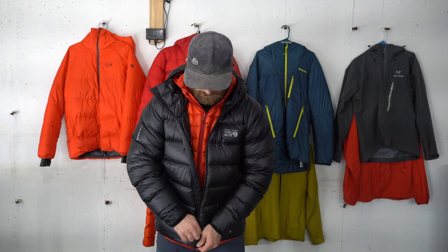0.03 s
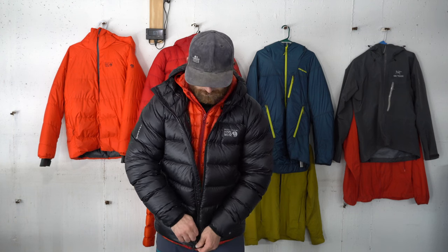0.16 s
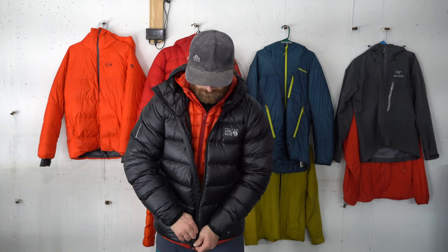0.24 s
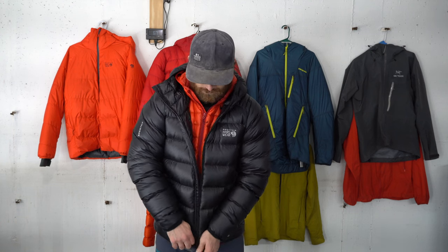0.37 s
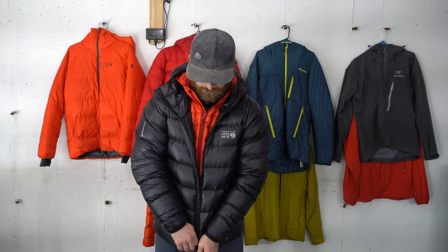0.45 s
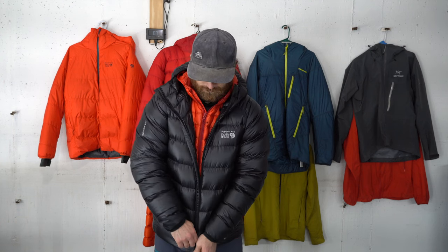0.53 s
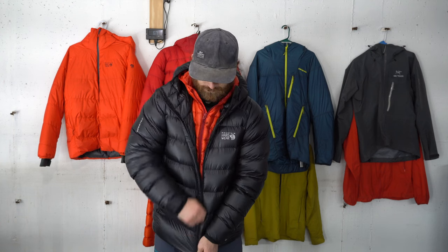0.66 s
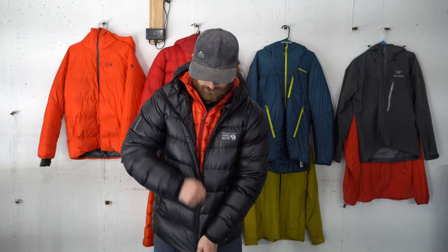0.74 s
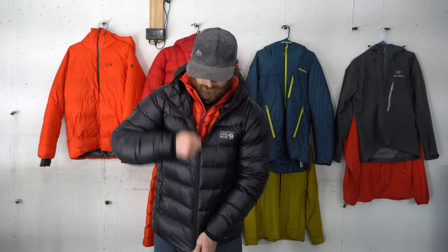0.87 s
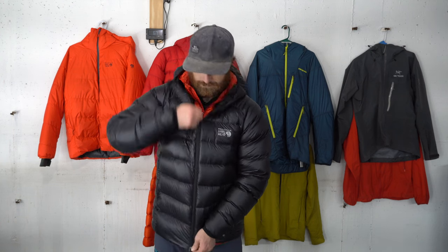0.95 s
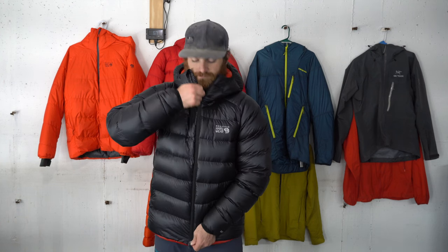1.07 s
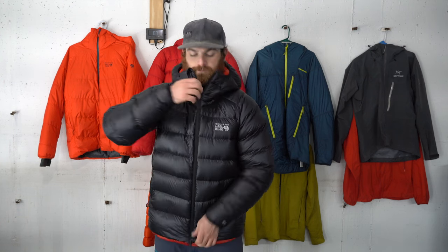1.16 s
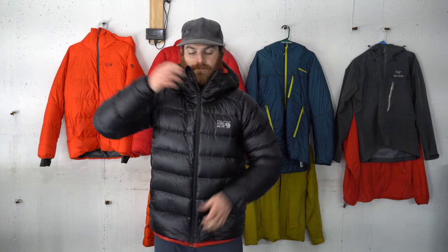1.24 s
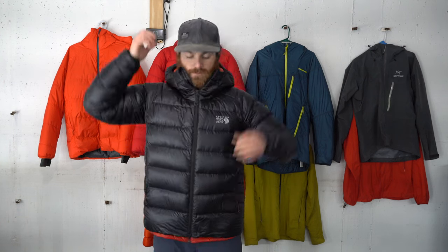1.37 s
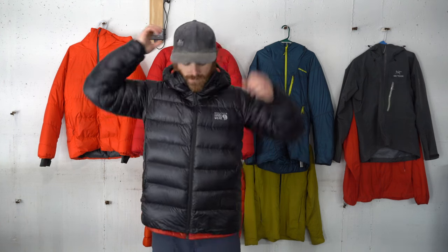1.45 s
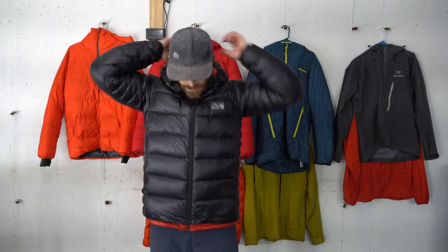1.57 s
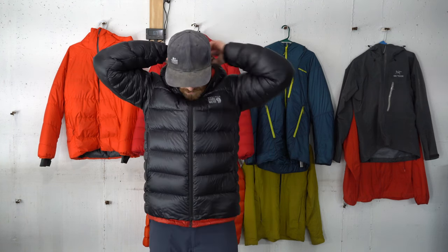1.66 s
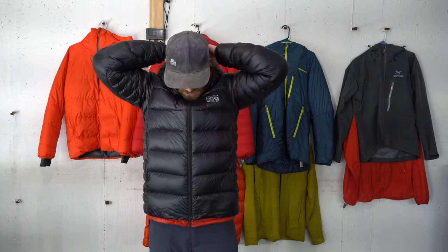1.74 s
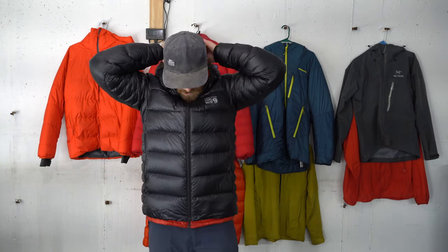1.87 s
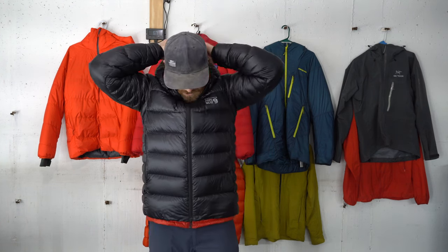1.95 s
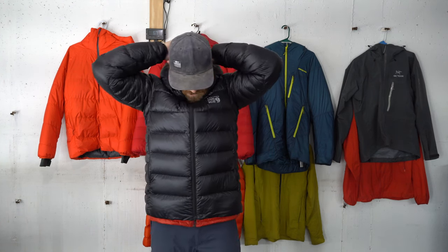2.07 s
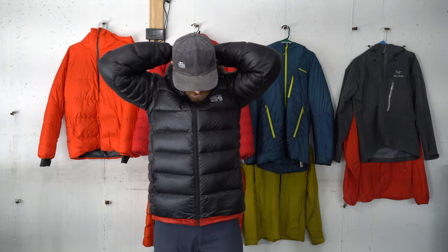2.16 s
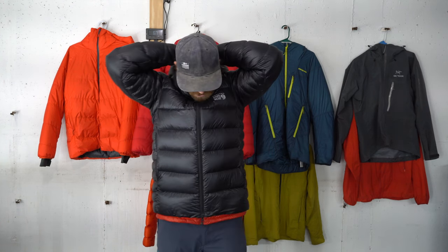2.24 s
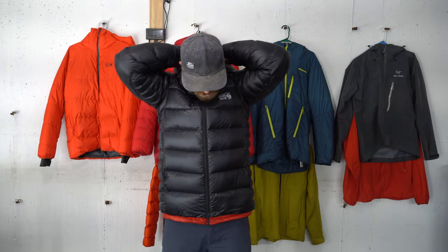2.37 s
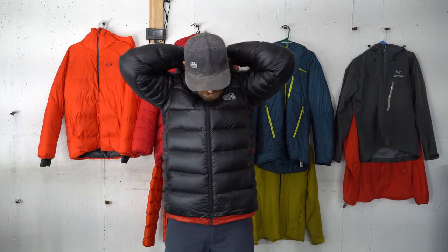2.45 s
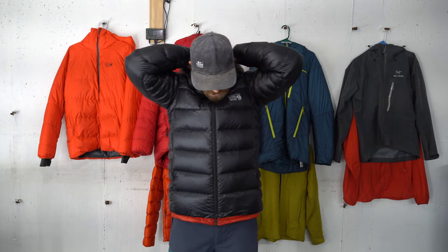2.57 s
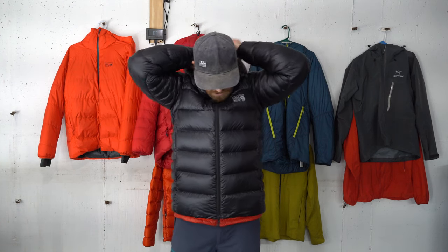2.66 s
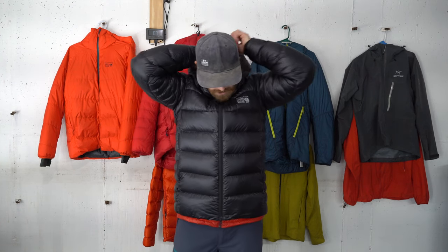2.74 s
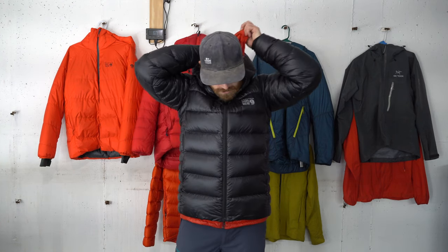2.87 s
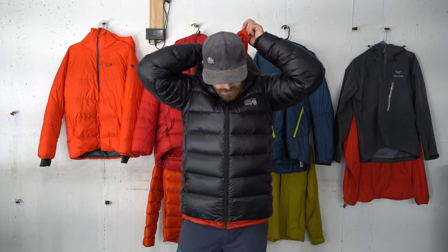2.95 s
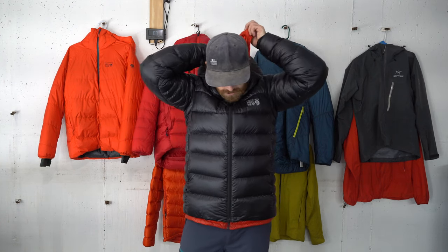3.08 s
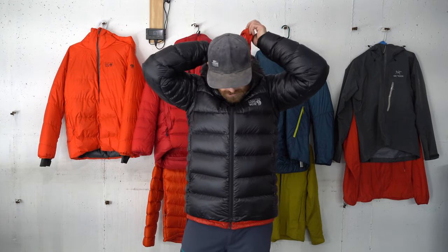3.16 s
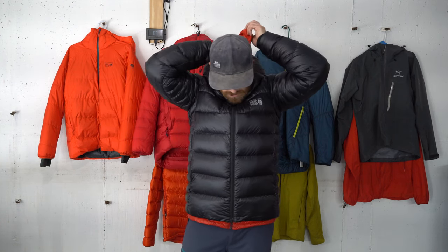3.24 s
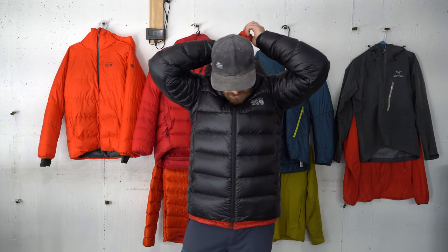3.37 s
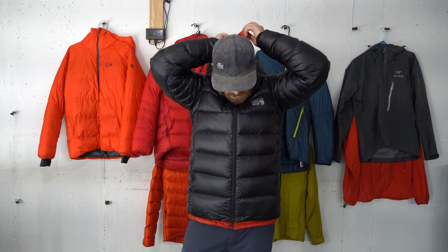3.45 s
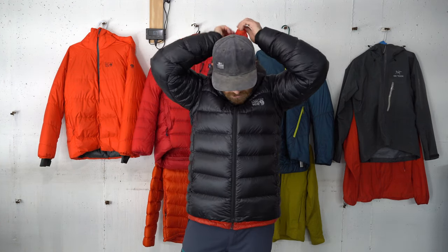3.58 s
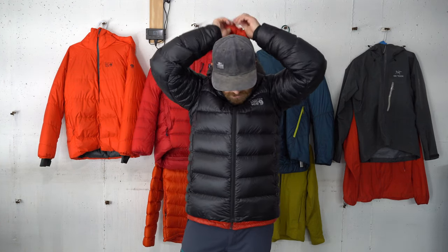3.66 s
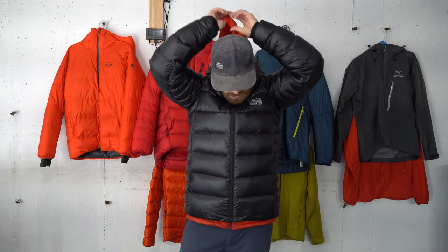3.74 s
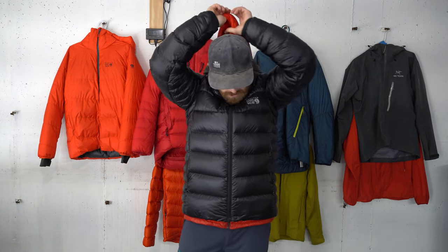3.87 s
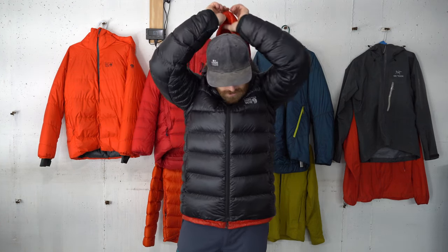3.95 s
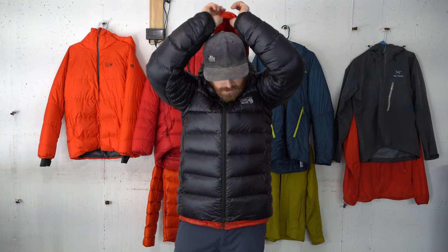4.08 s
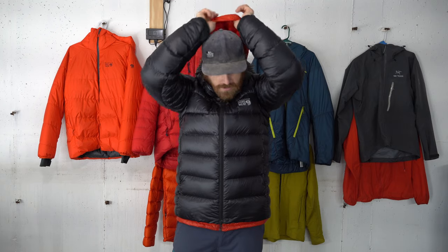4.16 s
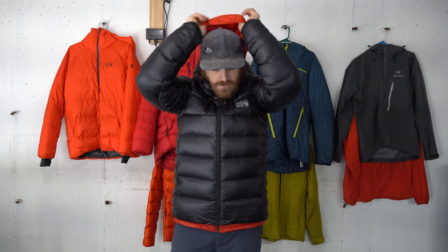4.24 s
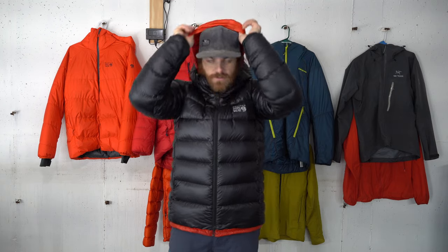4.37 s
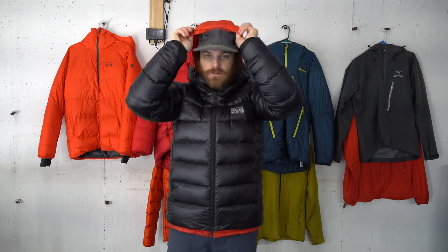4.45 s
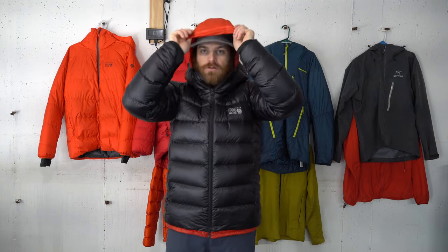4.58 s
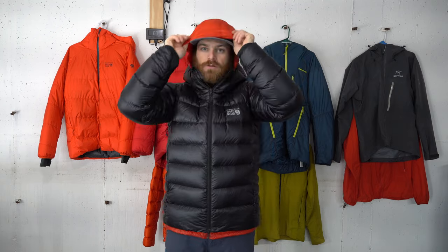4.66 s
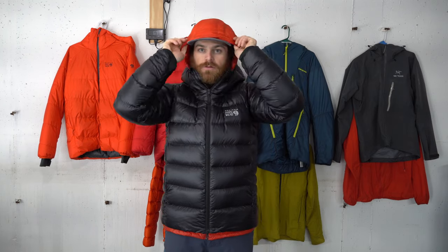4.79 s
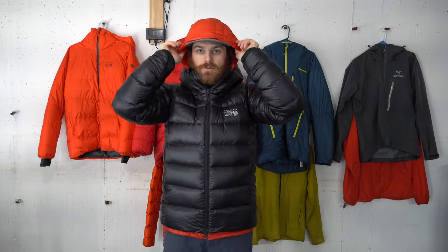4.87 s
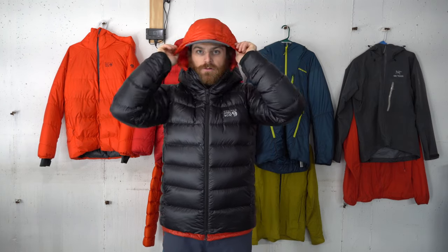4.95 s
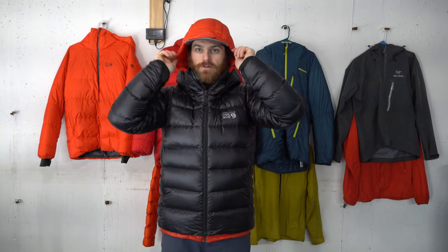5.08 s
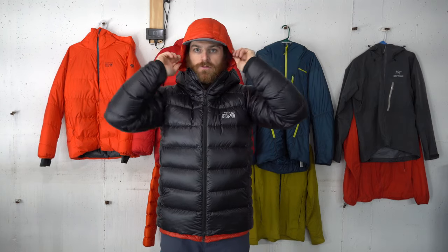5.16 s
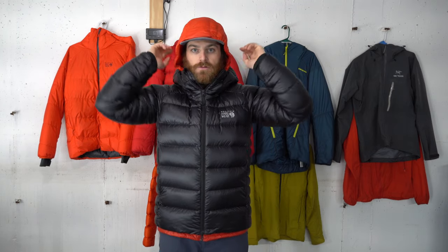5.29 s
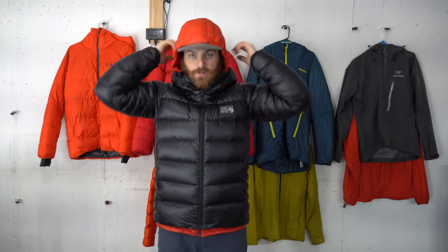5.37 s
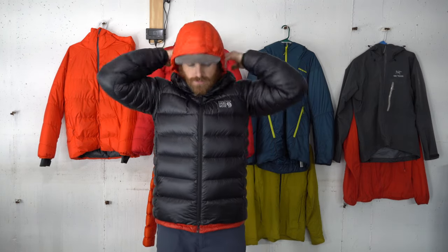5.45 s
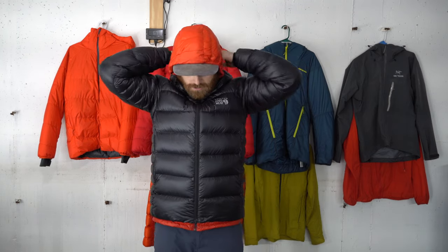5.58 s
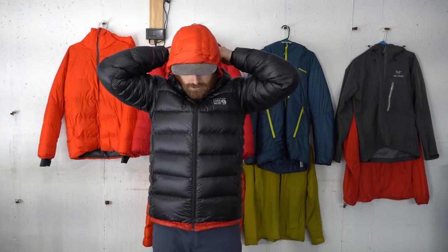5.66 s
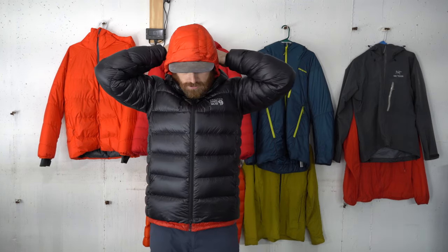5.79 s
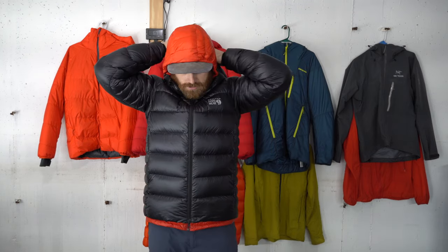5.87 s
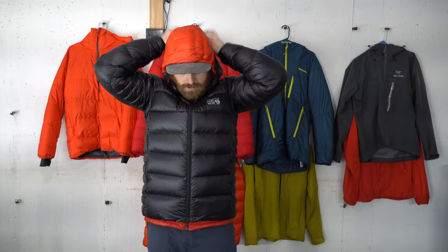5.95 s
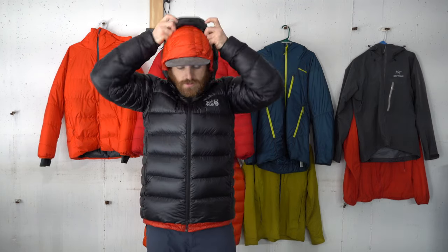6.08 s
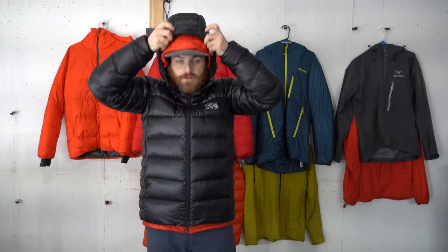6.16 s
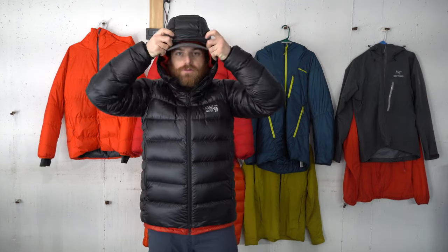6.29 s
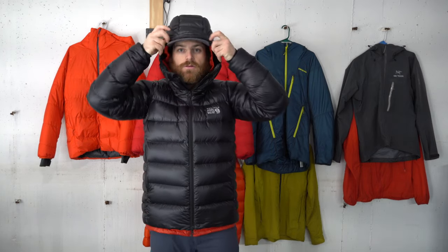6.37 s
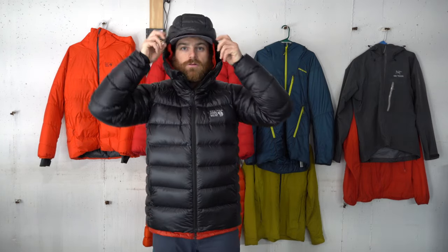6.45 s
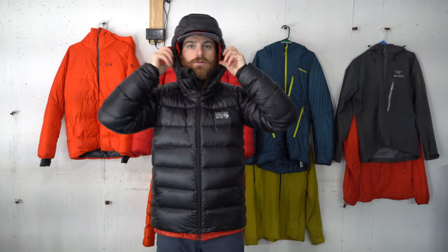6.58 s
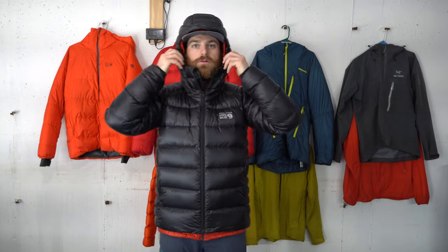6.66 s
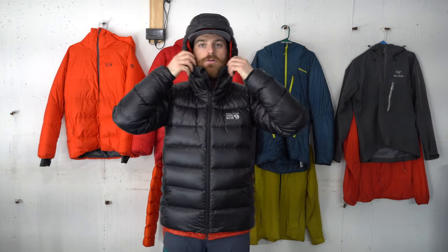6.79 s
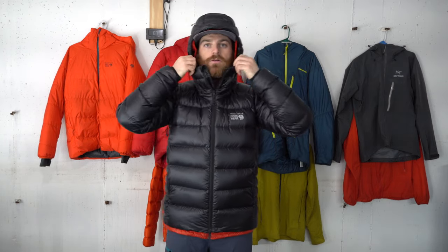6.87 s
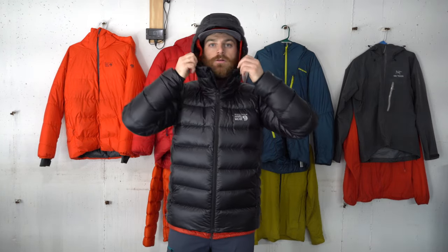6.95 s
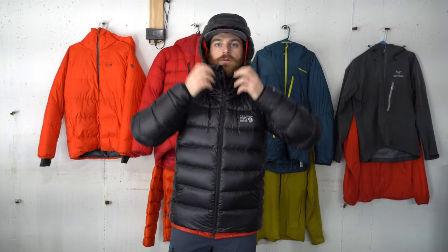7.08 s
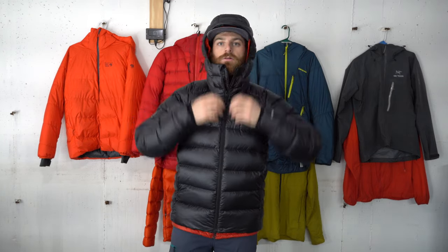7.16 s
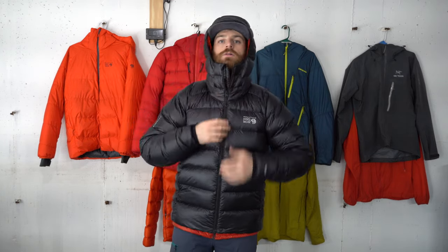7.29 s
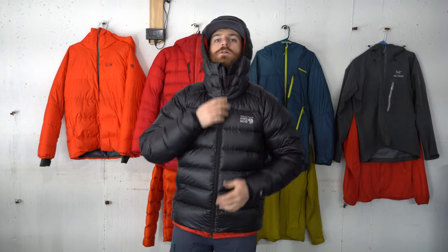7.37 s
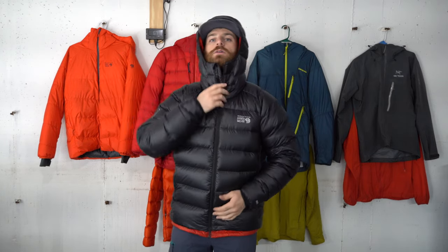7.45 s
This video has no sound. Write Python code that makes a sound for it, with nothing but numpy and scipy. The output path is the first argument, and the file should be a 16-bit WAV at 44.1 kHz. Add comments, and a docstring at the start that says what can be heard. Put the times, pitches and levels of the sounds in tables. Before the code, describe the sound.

Close to a microphone clipped on the chest, a jacket zipper rasps upward for half a second after a faint rustle. The rest is moving fabric: dull crumpling of down padding, swishing sleeves and nylon sliding on nylon as an inner and then an outer hood go on. Creases tick and cloth now and then thumps lightly against the microphone, over a faint indoor hush.

```python
"""A soft rustle of sleeves, then a down jacket zips up in one quick pull and two nylon hoods are drawn
over the head, all close to a clip-on microphone. The slider sings at the rate of the teeth and slows
at the collar. Moving arms crumple the padding, sleeves swish and nylon slides on nylon, each a swarm
of tiny slips. Folds pop, creases tick and cloth bumps the microphone over a quiet room tone."""
import sys
import numpy as np
from scipy import signal
from scipy.fft import rfft, irfft, next_fast_len
from scipy.io import wavfile

SR = 44100
rng = np.random.default_rng(int(sys.argv[2]) if len(sys.argv) > 2 else 0)


def to_wav(sig):
    """Store sig (one row per channel, or 1-D mono) as 16-bit WAV at the path in sys.argv[1].

    Samples outside -1..1 are clipped; the rate is SR.
    """
    pcm = np.clip(np.atleast_2d(sig), -1, 1) * 32767
    pcm = np.round(pcm).astype(np.int16)
    wavfile.write(sys.argv[1], SR, pcm.T)  # frames by channels


N = 331835
T = np.arange(N) / SR

# tooth pairs passing the slider each second, before judder and braking: t/s, f/Hz
SLIDER_SPEED = [(0.715, 786), (0.747, 701), (0.769, 728), (0.813, 639), (0.841, 631), (0.891, 861.9),
                (0.979, 996.2), (1.015, 729.6), (1.035, 692), (1.099, 430), (1.119, 400), (1.135, 319.8),
                (1.149, 235.3), (1.165, 402.5), (1.171, 451), (1.183, 384.3), (1.201, 291.4), (1.23, 199)]
# how the slider grips: t/s, pair tone level/dB, bite level/dB
SLIDER_GRIP = [(.72, -34, -55), (.81, -44, -52), (.85, -22.5, -50), (.878, -20, -58), (.93, -30, -46.5),
               (.98, -24.5, -47), (1.005, -31, -33.5), (1.11, -30, -33.5), (1.14, -26, -36.5),
               (1.18, -21, -31), (1.23, -19.5, -44)]
# the zipper tape rings when single teeth come at its resonance: f/Hz, gain/dB
TAPE_RESONANCE = [(300, 11.5), (600, -5), (950, -2), (1150, -3.5), (1280, 5.5), (1420, 1), (1600, 0.5),
                  (2000, -7)]
# how the tape passes the higher overtones: f/Hz, gain/dB
TAPE_EQ = [(200, 0), (1400, 0), (2100, -5), (2750, 0), (3700, -9), (4700, -6), (6200, -5), (7800, -8),
           (12000, -26)]
# colour of the slider's scrape: f/Hz, gain/dB
RASP_EQ = [(200, -5), (700, 9), (1400, 3), (2000, -4), (2800, -8), (3500, -8), (4500, -25), (8000, -33)]
# arm gestures (zip up, reach behind the neck, inner hood, outer hood, hands down):
# fastest moment t/s, rise/s, fall/s, crumple level/dB, swish level/dB, slide level/dB
ARM_STROKES = [ (.12, 0.3, 0.36, -56, -66, -67), (0.539, 0.083, 0.064, -44.5, -50, -55.5),
               (.79, 0.14, 0.2, -47.5, -82, -60), (1.041, 0.042, 0.11, -45.5, -43.5, -51),
               (1.211, 0.12, 0.086, -38.5, -45.5, -49.5), (1.47, 0.17, 0.2, -43.5, -43, -49.5),
               (1.598, 0.056, 0.1, -37.5, -42, -75), (1.739, 0.11, 0.19, -39, -47.5, -67),
               (2.38, 0.24, .14, -38.5, -49.5, -61), (2.699, 0.031, 0.023, -61, -70, -79),
               (2.928, 0.18, 0.11, -38, -42.5, -59), (3.225, 0.096, 0.074, -42, -46, -75),
               (3.42, 0.043, 0.049, -44.5, -53, -80), (3.601, 0.11, 0.089, -44.5, -54, -81),
               (3.779, 0.12, 0.1, -39, -52, -82), (4.082, 0.12, 0.2, -38, -45.5, -57),
               (4.342, 0.057, 0.041, -40.5, -43.5, -51.5), (4.439, 0.062, 0.11, -43.5, -48, -52),
               (4.61, 0.12, .06, -49, -57.5, -56), (4.79, 0.24, 0.33, -52, -56.5, -54.5),
               (5.09, 0.091, 0.07, -47, -51.5, -53), (5.18, 0.065, 0.056, -48.5, -53, -52.5),
               (5.35, 0.12, 0.27, -48, -49, -53.5), (5.515, .06, 0.19, -39, -45.5, -58),
               (5.819, .04, 0.044, -46.5, -67, -62.5), (6.127, 0.11, 0.088, -34, -42.5, -63.5),
               (6.214, 0.13, .13, -37.5, -41.5, -51), (6.488, 0.12, 0.24, -50, -61, -56),
               (6.661, 0.055, 0.057, -44, -52, -53.5), (6.941, .04, 0.12, -56, -50.5, -58.5),
               (7.04, 0.14, 0.089, -44, -46.5, -50.5), (7.398, 0.31, 0.11, -50.5, -67, -57.5)]
# the bed of rustle from arms that never rest: crumple level/dB, swish level/dB, slide level/dB
ARM_STIR = [-52, -57, -73.5]
# colours of the cloth layers: f/Hz, gain/dB
PADDING_EQ = [(20, -10), (60, -12), (150, 2), (330, 2), (600, -0.5), (950, -3.5), (1400, -10), (2200, -18),
              (4000, -91.5)]  # dull crumple
SLEEVE_EQ = [(300, -3), (800, -2.5), (1400, 1.5), (2100, -2), (3000, -5), (4200, -12.5), (7000, -23.5),
             (9000, -50)]  # midrange swish
NYLON_EQ = [(900, -13), (2400, 2), (4000, 2), (5500, 0.5), (7200, -1.5), (7900, -6.5), (8700, -13.5),
            (11000, -13.5), (13500, -15), (15500, -21)]  # bright slide
FLUTTER_EQ = [(12, -9), (28, 1.5), (55, 0.5), (90, 2.5), (170, -5), (400, -49)]  # low puffs of air
CREASE_EQ = [(500, 3), (1800, 9.5), (4000, 4.5), (7200, 0), (8700, -11), (13500, -12), (15500, -20)]  # crisp ticks
# folds that snap over: t/s, peak level/dB, f/Hz
FOLD_POPS = [(.679, -42, 500), (.706, -28, 520), (1.263, -31, 600), (1.272, -30, 400), (1.4203, -17, 270),
             (1.4215, -22, 650), (1.4863, -16, 1000), (1.685, -19, 950), (2.0355, -30, 900),
             (2.5595, -30, 1000), (3.878, -32, 650), (4.2635, -28, 900), (5.6668, -23, 900),
             (5.682, -29, 900), (5.779, -31, 230), (5.807, -31, 280), (5.9085, -32, 900),
             (6.1255, -19, 600), (6.4805, -31, 800), (7.0585, -28, 700)]
# soft bumps of cloth on the microphone: t/s, peak level/dB, f/Hz
MIC_BUMPS = [(.7085, -20.5, 73), (1.138, -31, 64), (1.2275, -21, 111), (1.587, -26.5, 46), (2.47, -30, 63),
             (2.914, -27, 60.5), (2.975, -28, 50.4), (3.746, -26.5, 70), (4.36, -29.5, 110),
             (4.486, -31, 61.5), (6.198, -26.5, 81.6), (6.92, -31.5, 92), (7.055, -33.5, 68.6)]
# sharp creases that flip: t/s, peak level before EQ/dB
CREASE_TICKS = [(.538, -43), (1.752, -28.5), (2.355, -30), (2.41, -26), (2.541, -30.5), (2.668, -35),
                (3.177, -30), (3.492, -31), (3.818, -32), (3.903, -32.5), (4.028, -39), (7.16, -35),
                (7.447, -33)]
# colour of the room's low hush: f/Hz, gain/dB
ROOM_EQ = [(30, -11.5), (200, -8), (450, -2), (700, -2.5), (1000, -10), (2000, -19.5), (6000, -36.5)]


def zipper(start_s=0.706, stop_s=1.233, attack_s=0.04, release_s=0.011, brake_s=0.022,
           judder_hz=58, judder_depth=0.048, full_bite_db=-33, rasp_db=-4):
    """Left and right teeth mesh in turn: a pair tone, a tooth tone, and overtones as the slider bites."""
    pair_hz, = curves(SLIDER_SPEED)
    pair_db, bite_db = curves(SLIDER_GRIP)
    strain = np.minimum(undb(bite_db - full_bite_db), 1)
    # a biting slider catches and lets go; the collar halves its speed
    judder = np.sin(2 * np.pi * np.cumsum(judder_hz * (1 + 0.216 * wander(40))) / SR)
    brake = np.interp(stop_s - T, [0, brake_s], [.5, 1])
    pair_hz = pair_hz * (1 + judder_depth * strain * judder) * brake
    # a slow slider catches on single teeth, so its rhythm is less even
    jitter = 0.0078 + .012 * strain + .032 * (300 / np.maximum(pair_hz, 250)) ** 2
    phase = 2 * np.pi * np.cumsum(pair_hz * (1 + jitter * wander(900))) / SR
    shimmer_db = 1.53 + strain
    tooth_db = -18.5 + 0.19 * bite_db + shimmer_db * wander(350)
    tooth_gain = eq_gain(TAPE_RESONANCE, 2 * pair_hz) * undb(tooth_db)
    # no two teeth are alike, so a weak pair tone comes and goes
    pair_gain = undb(pair_db + shimmer_db * wander(350)) + .07 * tooth_gain * wander(200)
    tones = pair_gain * np.sin(phase) + tooth_gain * np.sin(2 * phase)
    # faster teeth strike more sharply and keep their high overtones
    rolloff = np.minimum(1150 / pair_hz, 2) ** 1.4
    overtones = np.zeros(N)
    for k in range(3, 10):
        gain = (3 / k) ** rolloff * eq_gain(TAPE_EQ, k * pair_hz) * undb(2 * wander(160))
        overtones += gain * np.sin(k * phase + .7 * wander(250))
    # each tooth scrapes through the slider
    rasp = unit_rms(colour(rng.standard_normal(N) * np.sin(phase) ** 2, RASP_EQ))
    bite = undb(bite_db) * (overtones + undb(rasp_db) * rasp)
    fade_in = np.clip((T - start_s) / attack_s, 0, 1)
    fade_out = np.sqrt(np.clip((stop_s - T) / release_s, 0, 1))
    return fade_in * fade_out * (np.sqrt(2) * tones + bite)


def arm_movement(stir_start_s=0.636, stir_fade_s=0.056, swell_shape=1.47):
    """Crumple, swish and slide envelopes in dB: each stroke swells and fades over the arms' steady stir."""
    stir_fade = np.clip((T - stir_start_s) / stir_fade_s, 1e-3, 1)
    power = np.outer(undb(ARM_STIR) ** 2, stir_fade)
    for peak_s, rise_s, fall_s, *levels_db in ARM_STROKES:
        away = np.maximum((peak_s - T) / rise_s, (T - peak_s) / fall_s)
        near = away < 6
        swell = np.exp(-away[near] ** swell_shape)  # shape 1 is pointed, 2 is a bell
        power[:, near] += np.outer(undb(levels_db), swell) ** 2
    return 10 * np.log10(power)


def cloth(flutter_db=-8):
    """Padding crumples, sleeves swish and nylon slides; faster movement brings more slips a second."""
    crumple_db, swish_db, slide_db = arm_movement()
    grip = wander(45)  # the cloth catches and lets go
    folds = slips(3600 * undb(0.46 * (crumple_db + 41)), spread_db=2)
    rubs = slips(5000 * undb(0.54 * (swish_db + 45.5)), spread_db=3)
    threads = slips(14000 * undb(0.47 * (slide_db + 55)), spread_db=1.5)
    padding = layer(folds, PADDING_EQ, crumple_db + 1.4 * grip)
    sleeve = layer(rubs + 0.09 * folds, SLEEVE_EQ, swish_db + 1.9 * grip)
    nylon = layer(threads, NYLON_EQ, slide_db + 1.5 * grip)
    # the puffy chambers push air against the microphone
    flutter = layer(rng.standard_normal(N), FLUTTER_EQ, crumple_db + flutter_db + 4.7 * wander(20))
    # the thin shell crinkles wherever it is bent
    crinkle_db = 0.32 * (crumple_db + 45) + 0.57 * (slide_db + 62.5) - 61.5
    crinkle = layer(slips(110, spread_db=1.5), CREASE_EQ, crinkle_db)
    return padding + sleeve + nylon + flutter + crinkle


def slips(per_s, spread_db):
    """Cloth moves in a swarm of tiny slips: clicks at random moments, most weak and a few strong."""
    happens = rng.random(N) < per_s / SR
    strength = undb(spread_db * np.minimum(rng.exponential(size=N), 5))
    return unit_rms(happens * strength * rng.choice([-1, 1], N))


def pops(cues):
    """A released fold or a bump of cloth swings for about one cycle and dies."""
    out, t = np.zeros(N), T[:SR // 6]
    for start_s, peak_db, hz in cues:
        swing = np.sin(2 * np.pi * hz * t) * np.exp(-(hz * t) ** 1.5)
        place(out, start_s, -undb(peak_db) * swing / np.abs(swing).max())
    return out


def creases(decay_s=0.00019):
    """A crease flips with a short bright tick."""
    out, t = np.zeros(N), T[:SR // 100]
    for start_s, level_db in CREASE_TICKS:
        tick = rng.standard_normal(len(t)) * np.exp(-t / decay_s)
        place(out, start_s, undb(level_db) * tick / np.abs(tick).max())
    return colour(out, CREASE_EQ)


def room(direct, t60_s=1.0, predelay_s=0.006, wet_db=-27, hush_db=-61):
    """Bare walls answer faintly, far from the microphone, over the low hush of the room."""
    t = T[:SR // 2]
    tail = rng.standard_normal(len(t)) * np.exp(-np.log(1000) * t / t60_s) * (t > predelay_s)
    reverb = signal.fftconvolve(direct, tail / np.sqrt(np.sum(tail ** 2)))[:N]
    hush = layer(rng.standard_normal(N), ROOM_EQ, hush_db)
    return direct + undb(wet_db) * reverb + hush


def undb(db):
    """Decibels to gain."""
    return 10 ** (np.asarray(db) / 20)


def unit_rms(x):
    """Scale to rms 1."""
    return x / np.sqrt(np.mean(x ** 2))


def curves(rows):
    """One automation curve per column, in straight lines between the times in the first."""
    times, *columns = np.transpose(rows)
    return [np.interp(T, times, column) for column in columns]


def wander(per_s):
    """Random modulation of rms 1 that finds a new value per_s times a second."""
    return unit_rms(np.interp(T * per_s, np.arange(N), rng.standard_normal(N)))


def eq_gain(eq, hz):
    """Linear gain of an EQ curve at the given frequencies."""
    points_hz, points_db = np.transpose(eq)
    return undb(np.interp(np.log(np.maximum(hz, 1)), np.log(points_hz), points_db))


def colour(x, eq):
    """Minimum-phase EQ, so that clicks keep their sharp attacks."""
    size = next_fast_len(N + SR // 4, True)
    size += size % 2
    bins_hz = np.arange(size // 2 + 1) * SR / size
    cepstrum = irfft(np.log(eq_gain(eq, bins_hz)))
    cepstrum[1:size // 2] *= 2
    cepstrum[size // 2 + 1:] = 0
    return irfft(rfft(x, size) * np.exp(rfft(cepstrum)))[:N]


def layer(source, eq, fader_db):
    """Colour a source, normalise it and ride its level."""
    return unit_rms(colour(source, eq)) * undb(fader_db)


def place(out, start_s, sound):
    """Mix a short sound in at its cue."""
    i = int(start_s * SR)
    out[i:i + len(sound)] += sound[:N - i]


def scene():
    """Everything reaches one microphone on the chest."""
    mono = room(zipper() + cloth() + pops(FOLD_POPS) + pops(MIC_BUMPS) + creases())
    return np.array([mono, mono])


def record(dry):
    """Lows and mids lean slightly right, each channel has its own faint hiss, and the top is cut."""
    body = signal.sosfiltfilt(signal.butter(2, 3100, fs=SR, output="sos"), dry)
    leaning = dry + 0.074 * np.array([[-1], [1]]) * body
    hiss = undb(-85.5) * rng.standard_normal((2, N))
    high_cut = signal.ellip(10, .2, 80, 15500, fs=SR, output="sos")
    return signal.sosfilt(high_cut, leaning + hiss)


dry = scene()
out = record(dry)
to_wav(out)
```